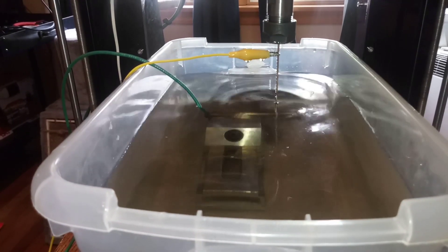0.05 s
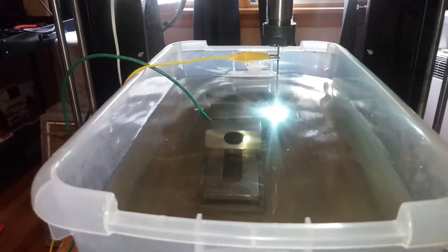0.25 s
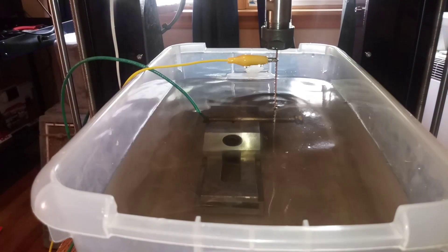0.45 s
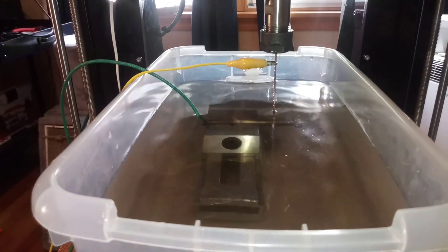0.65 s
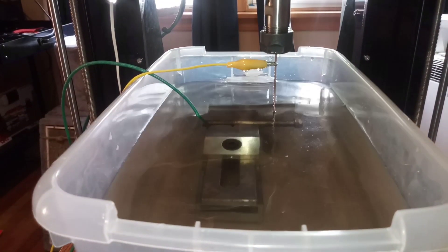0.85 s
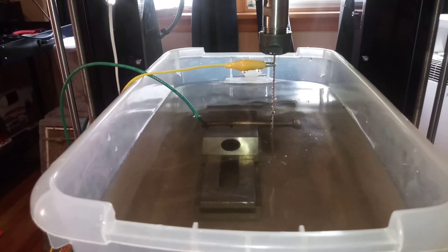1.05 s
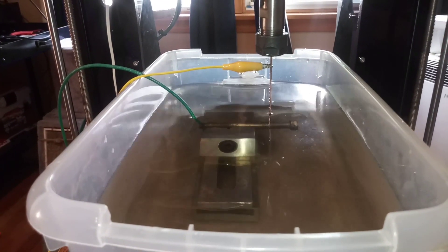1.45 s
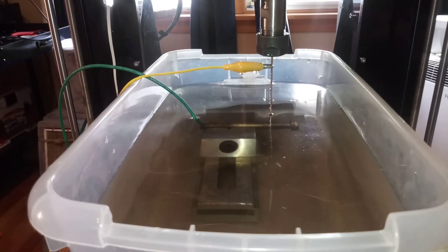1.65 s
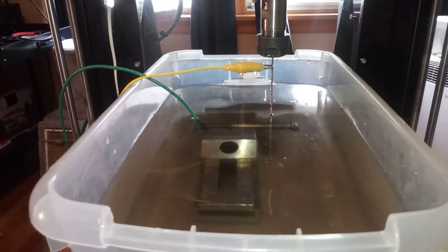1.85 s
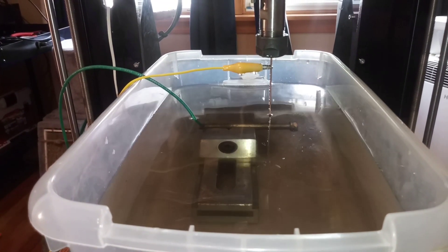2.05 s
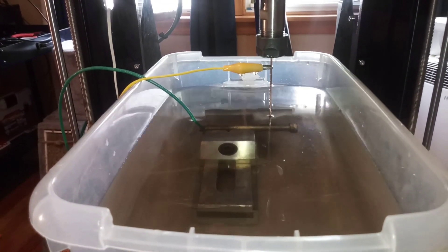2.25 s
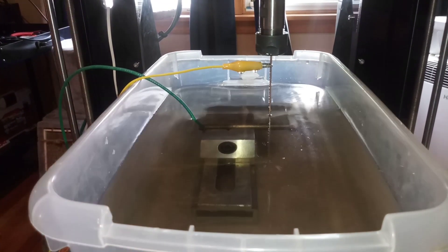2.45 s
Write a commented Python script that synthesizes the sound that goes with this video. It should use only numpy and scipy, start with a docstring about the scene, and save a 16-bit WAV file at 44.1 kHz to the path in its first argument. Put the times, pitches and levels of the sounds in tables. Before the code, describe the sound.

Close up in a small workshop, an electrical arc in a water tub gives a sharp double crack and brief crackle. Three short motor buzzes with clicks follow, then a smaller spark, over steady fan hum and faint hiss.

```python
"""An electrode strikes an arc in a plastic tub of water: two sharp cracks of vapour bubbles, then a dense
crackling tail that holds and dies away. The stepper motor that lowers it on a shaft twitches briefly during
that tail, then buzzes through three longer moves, the last ending in a weak spark. Behind it, cooling fans hum
throughout and the motor's coils hiss while it rests. The place is a small workshop, the microphone close and
facing the tub."""
import sys
import numpy as np
from scipy import signal
from scipy.fft import rfft, irfft, next_fast_len
from scipy.io import wavfile
from scipy.ndimage import map_coordinates

SR = 44100
rng = np.random.default_rng(int(sys.argv[2]) if len(sys.argv) > 2 else 0)


def unload_audio(sound):
    """Save the sound as a 16-bit wav file, at the path given as the first command line argument."""
    columns = np.transpose(np.atleast_2d(sound))
    # keep every value between -1 and 1, then stretch to whole-number steps
    steps = np.round(np.clip(columns, -1, 1) * 32767)
    wavfile.write(sys.argv[1], SR, steps.astype(np.int16))


N = 114660


def amp(db):
    """Decibels to gain."""
    return 10 ** (np.asarray(db) / 20)


def unit(x):
    """Scale to rms 1."""
    return x / np.sqrt(np.mean(x ** 2) + 1e-20)


def along(points, hz):
    """Read (Hz, value) points at hz, on a log axis."""
    freqs, values = np.transpose(points)
    return np.interp(np.log(hz + 1), np.log(freqs + 1), values)


def since(start_s):
    """Seconds elapsed after start_s, zero before."""
    return np.maximum(np.arange(N) / SR - start_s, 0)


def wobble(rate):
    """A smooth random curve, rate knots a second."""
    return map_coordinates(rng.standard_normal(int(N * rate / SR) + 4), [np.arange(N) * rate / SR])


def filtered(x, response):
    """Shape the spectrum of x by a function of frequency."""
    size = 2 * next_fast_len(N)
    return irfft(rfft(x, size) * response(np.fft.rfftfreq(size, 1 / SR)), size)[..., :N]


def coloured(x, colour):
    """Pass x through a causal filter of unit power with the given spectrum."""
    def minimum_phase(hz):
        cepstrum = irfft(np.log(unit(amp(along(colour, hz)))))
        half = len(cepstrum) // 2
        cepstrum[1:half] *= 2
        cepstrum[half + 1:] = 0
        return np.exp(rfft(cepstrum))
    return filtered(x, minimum_phase)


def noise():
    """White noise."""
    return rng.standard_normal(N)


def grains(per_s, spread_db):
    """Random impulses of uneven size, rms 1."""
    return unit((rng.random(N) < per_s / SR) * np.sign(noise()) * amp(spread_db * noise()))


def gate(start, stop, attack_s, fall_db_per_s):
    """Rise from start, hold, then fall from stop."""
    return (1 - np.exp(-since(start) / attack_s)) * amp(-fall_db_per_s * since(stop))


def bursts(rows, t60_s):
    """A dying puff of noise for each (start_s, level_db)."""
    return noise() * sum((since(start) > 0) * amp(db - 60 * since(start) / t60_s) for start, db in rows)


def tone(hz, drift):
    """A sine of rms 1 whose pitch strays by the relative curve drift."""
    return np.sqrt(2) * np.sin(2 * np.pi * (hz * np.cumsum(1 + drift) / SR + rng.random()))


# Decay of the workshop: freq_hz, t60_s
ROOM_DECAY = [(150, .4), (1000, 0.25), (8000, 0.23), (16000, 0.31)]
def room(x):
    """The workshop's walls return a short diffuse tail to the microphone."""
    hz, t, spectrum = signal.stft(rng.standard_normal(SR // 2), SR, nperseg=256)
    decay = amp(-60 * t / along(ROOM_DECAY, hz)[:, None])
    tail = signal.istft(spectrum * decay, SR, nperseg=256)[1]
    tail *= 1 - np.exp(-np.arange(len(tail)) / SR / 0.0083)  # reflections build up
    return signal.fftconvolve(x, tail / np.linalg.norm(tail))[:N]


# Fan air in the background: freq_hz, gain_db
AIR_COLOUR = [(30, -32), (70, -34), (140, -20), (220, -20.5), (275, -10), (340, -9), (410, -5), (440, -19),
              (490, -4.5), (530, -5.5), (600, 3.5), (750, 0), (900, -9.5), (1350, -9.5), (1800, -15.5),
              (2300, -18), (3300, -24.5), (4700, -39), (5600, -30), (6700, -22.5), (9000, -27),
              (11700, -39.5), (12500, -36), (13700, -39), (14700, -29), (16000, -23.5)]
# Blade tones: pitch_hz, level_db
BLADE_TONES = [(274.5, -66), (414, -64), (480, -61.5), (597, -67), (657, -66), (754, -58), (1136, -70.5),
               (1373, -66.5), (1717, -73.5), (2196, -71)]
def fans():
    """Cooling fans push rushing air, with slightly unsteady blade tones."""
    air = amp(-49.5 + 0.4 * wobble(25.05)) * coloured(noise(), AIR_COLOUR)
    return air + sum(amp(db + wobble(5.9)) * tone(hz, 0.00332 * wobble(11)) for hz, db in BLADE_TONES)


# The motor at rest, faint at the microphone: start_s, end_s, centre_hz, width_hz, whistle_db, hiss_db
COIL_RESTS = [(0, .25, 16800, 600, -58, -82), (.35, 1.2, 14760, 500, -60.5, -63),
              (1.315, 1.616, 6630, 180, -66.5, -84), (1.715, 2.003, 6450, 230, -65.5, -82)]
# Broad hiss of the coils: freq_hz, gain_db
COIL_COLOUR = [(2000, -34), (5000, -47), (7000, -8), (11500, 5.5), (13000, -5), (16000, 6.5)]
def coils():
    """The holding current hisses at a pitch set by where the motor came to rest."""
    out = np.zeros(N)
    hiss = coloured(noise(), COIL_COLOUR)
    for start, end, centre_hz, width_hz, whistle_db, hiss_db in COIL_RESTS:
        whistle = unit(filtered(noise(), lambda hz: 1 / (1 + ((hz - centre_hz) / width_hz) ** 2)))
        resting = gate(start, end, attack_s=0.002, fall_db_per_s=900)
        out += resting * (amp(whistle_db) * whistle + amp(hiss_db) * hiss)
    return out


# Clicks along the carriage's travel: start_s, level_db
CARRIAGE_CLICKS = [(1.234, -38), (1.249, -36), (1.275, -37), (1.299, -35.5), (1.309, -38), (1.321, -42),
                   (1.609, -35.5), (1.62, -44), (1.632, -39), (1.647, -36), (1.671, -41), (1.708, -43.5),
                   (2.121, -55), (2.141, -42.5), (2.22, -37)]
# Their spectrum: freq_hz, gain_db
CARRIAGE_COLOUR = [(200, -14), (1000, 11), (2000, 0), (2900, 7.5), (3700, -13), (5200, -10.5), (7000, -5),
                   (11200, -17), (12000, -23), (16000, -17)]
def carriage():
    """The carriage clicks as it moves."""
    return coloured(bursts(CARRIAGE_CLICKS, t60_s=0.056), CARRIAGE_COLOUR)


# Knocks from the shaft over the tub: start_s, level_db
SHAFT_KNOCKS = [(0.328, -33), (.341, -26), (1.2, -26.5), (1.297, -30), (1.599, -28), (1.707, -31.5),
                (2.004, -24.5)]
# Their spectrum: freq_hz, gain_db
SHAFT_COLOUR = [(60, -19), (220, -4.5), (350, -3), (520, 7.5), (900, -15.5), (1300, 4.5), (1800, -14.5),
                (4000, -38), (12000, -52)]
def shaft():
    """Slack is taken up with a knock as the shaft starts or brakes."""
    attack_s, t60_s = 0.0048, 0.066
    knocks = sum(amp(db) * gate(start, start, attack_s, 60 / t60_s) for start, db in SHAFT_KNOCKS)
    return coloured(knocks * noise(), SHAFT_COLOUR)


# Harmonics of the step rate: multiple, relative_db
STEP_HARMONICS = [(1, 2.5), (3, -6), (4, 6.5), (8, -8.5), (9, -14), (12, -12), (13, -27)]
# The frame shaken by the motor: pitch_hz, relative_db
FRAME_MODES = [(271, -18), (307, -3.5), (563, -7.5), (953, -9), (1055, -4.5)]
def step_buzz():
    """The motor's steps make a rough buzz and set the frame singing; rms 1."""
    step_hz, rough_db = 198.9, 2.94
    drift = 0.0041 * wobble(40.66)
    steps = sum(amp(db + rough_db * wobble(90)) * tone(k * step_hz, drift) for k, db in STEP_HARMONICS)
    frame = sum(amp(db) * tone(hz, 0.0028 * wobble(30)) for hz, db in FRAME_MODES)
    return unit(steps + frame)


# Moves of the motor, near the microphone: start_s, stop_s, buzz_db, rattle_db, thud_db, boom_db
MOTOR_MOVES = [(0.303, 0.336, -37.5, -36.5, -28.5, -43), (1.197, 1.293, -36.5, -39, -33, -42),
               (1.602, 1.704, -39.5, -38, -34, -39.5), (2.006, 2.247, -36.5, -39.5, -28.5, -40.5)]
# Rattle while it runs: freq_hz, gain_db
MOTOR_RATTLE = [(30, -16), (60, -26), (100, -16), (135, -21.5), (180, -0.5), (230, -7), (305, -3.5),
                (420, -12), (490, -5), (700, -6.5), (790, 2.5), (860, -6.5), (1040, -6.5), (1600, -16),
                (2150, -22), (2500, -23), (3100, -27.5), (3600, -38), (8000, -38.5), (14000, -56)]
# Ring of the stopping thud: pitch_hz, relative_db, t60_s
STOP_MODES = [(105, -18, 0.22), (227.7, -2.5, 0.23), (253, 1.5, 0.18), (291.6, -1.5, 0.17),
              (392, -12, 0.21), (511.5, 1, 0.08), (593, -2, 0.095), (1069, 0, 0.11)]
def motor():
    """Each move buzzes, rattles, swells the frame's main resonance and stops with a ringing thud."""
    buzz = step_buzz()
    boom = amp(wobble(40.66)) * tone(hz=166.6, drift=0.0028 * wobble(30))
    rattle = coloured(grains(per_s=1500, spread_db=3), MOTOR_RATTLE)
    rings = [tone(hz, 0.0206 * wobble(40)) for hz, _, _ in STOP_MODES]
    out = np.zeros(N)
    for start, stop, buzz_db, rattle_db, thud_db, boom_db in MOTOR_MOVES:
        running = gate(start, stop, attack_s=0.012, fall_db_per_s=327)
        out += running * (amp(buzz_db) * buzz + amp(rattle_db) * rattle)
        out += amp(boom_db) * gate(start, stop, attack_s=0.019, fall_db_per_s=193) * boom
        for ring, (_, db, t60_s) in zip(rings, STOP_MODES):
            out += amp(thud_db + db) * gate(stop, stop, attack_s=0.019, fall_db_per_s=60 / t60_s) * ring
    return out


# Crackling tails after the sparks: start_s, hold_s, pops_db, fall_db_per_s, ring_db
SPARK_TAILS = [(0.24, 0.1, -29.5, 214, -41), (2.228, 0.061, -42, 283, -75)]
# Spectrum of the pops: freq_hz, gain_db
POP_COLOUR = [(30, -31), (100, -23), (200, -9), (370, -7.5), (600, -3), (900, 6), (1300, -0.5), (1800, 0),
              (2100, -3), (2600, -0.5), (3300, -13.5), (4300, -13), (5200, -21), (6000, -7.5), (7400, -5.5),
              (8800, -3.5), (10000, -18.5), (12500, -21), (14000, -31), (15000, -22), (16000, -6.5)]
# Tub and electrode ringing under the arc: pitch_hz, relative_db
RING_MODES = [(594, -7.5), (998, -15), (1173, -3), (1408, -20), (1713, -2), (1796, -32), (2748, -8),
              (6047, -12), (6705, -3), (8608, -2), (8930, -10), (9055, -8)]
def spark_tails():
    """A dense, ringing crackle follows the sparks, held level as if by a limiter, then dying away."""
    drift_hz = 4.16
    pops = coloured(grains(per_s=5000, spread_db=4.5), POP_COLOUR)
    ring = unit(sum(amp(db) * tone(hz, drift_hz / hz * wobble(67.3)) for hz, db in RING_MODES))
    out = np.zeros(N)
    for start, hold_s, pops_db, fall, ring_db in SPARK_TAILS:
        envelope = gate(start, start + hold_s, attack_s=0.00067, fall_db_per_s=fall)
        out += envelope * (amp(pops_db) * pops + amp(ring_db) * ring)
    return out


# Small snaps in the tub: start_s, level_db
ARC_SNAPS = [(.196, -43), (2.2345, -29), (2.2385, -25), (2.243, -27), (2.249, -40), (2.268, -50),
             (2.279, -30.5), (2.285, -30)]
# Their spectrum: freq_hz, gain_db
ARC_SNAP_COLOUR = [(150, -4), (800, 5), (2700, 3.5), (4400, -13), (6500, 5.5), (9000, -6.5), (11000, -12.5),
                   (13500, -12), (15000, -5)]
def snaps():
    """The arc and its bubbles give off small, dry snaps."""
    return coloured(bursts(ARC_SNAPS, t60_s=0.019), ARC_SNAP_COLOUR)


# Cracks in the tub, close in front of the microphone: start_s, pulse_db, half_length_s, spray_db, tub_db
ARC_CRACKS = [(0.2419, -12.5, 0.000568, -14, -26), (0.2888, -15.5, 0.000468, -17, -22)]
# The plastic wall struck by a crack: pitch_hz, relative_db, t60_s
WALL_MODES = [(666, -38, 0.036), (1090, -19, 0.059), (1890, 2, 0.019), (2780, 4, 0.0085)]
# A crack's bright spray of noise: freq_hz, gain_db
CRACK_COLOUR = [(150, -17), (600, -14), (2600, -12), (3600, -18), (5200, -14.5), (6400, -0.5), (8800, 0.5),
                (10500, -15.5), (13500, -17), (15000, 2), (16000, -13)]
# That spray reaching the microphone off ceiling and wall: delay_s, gain_db
SPRAY_ECHOES = [(.0066, -10), (0.0157, -6)]
def arc():
    """Each crack is a vapour bubble: a spike as it forms, suction, then a collapse that rings the tub."""
    low_cut_hz, spray_lag_s = 300, 0.00041
    pulses, tub = np.zeros(N), np.zeros(N)
    for start, pulse_db, half_s, _, tub_db in ARC_CRACKS:
        age = (np.arange(N) / SR - start) / half_s  # 0 at forming, 2 at collapse
        spikes = 0.89 * np.exp(-np.abs(age) / 0.33) + 1.67 * np.exp(-np.abs(age - 2) / 0.18)
        suction = np.sin(np.pi * np.clip(age / 2, 0, 1))
        pulses += amp(pulse_db) * (spikes - suction * spikes.sum() / suction.sum())  # sums to zero
        t = since(start + 2 * half_s)
        for hz, db, t60_s in WALL_MODES:
            tub += amp(tub_db + db - 60 * t / t60_s) * np.sin(2 * np.pi * hz * t)
    pulses = signal.sosfilt(signal.butter(2, low_cut_hz, 'highpass', fs=SR, output='sos'), pulses)
    spray = bursts([(start + spray_lag_s, db) for start, _, _, db, _ in ARC_CRACKS], t60_s=0.011)
    echoes = sum(amp(db) * np.roll(spray, round(delay_s * SR)) for delay_s, db in SPRAY_ECHOES)
    return pulses + tub + coloured(spray + echoes, CRACK_COLOUR)


# Room sound at the sides of the microphone: freq_hz, side_over_mid_db
STEREO_WIDTH = [(2400, -82), (3300, -92), (3900, -16.5), (6000, -39), (11000, -17.5), (16000, -17)]
def scene():
    """Every source sits straight ahead of the microphone; only the treble spreads a little."""
    sparks = arc() + snaps()
    drive = motor() + shaft() + carriage()
    reverb = amp(-7.5) * room(sparks) + amp(-9) * room(drive)
    mid = sparks + spark_tails() + drive + reverb + coils() + fans()
    side = filtered(room(mid), lambda hz: amp(along(STEREO_WIDTH, hz)))
    return np.array([mid + side, mid - side])


def record(dry):
    """The camera behind the microphone keeps nothing above its band limit."""
    top_hz = 15900
    return filtered(dry, lambda hz: hz < top_hz)


dry = scene()
out = record(dry)
unload_audio(out)
```